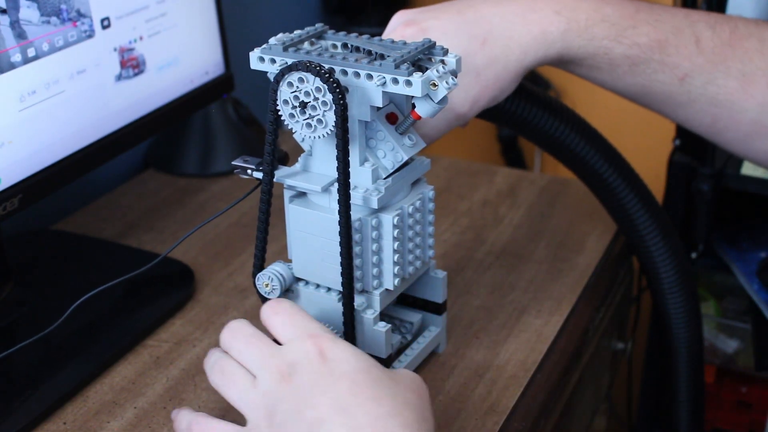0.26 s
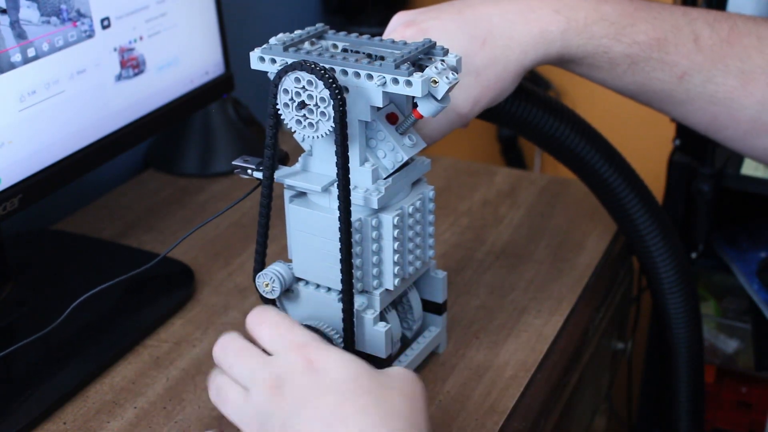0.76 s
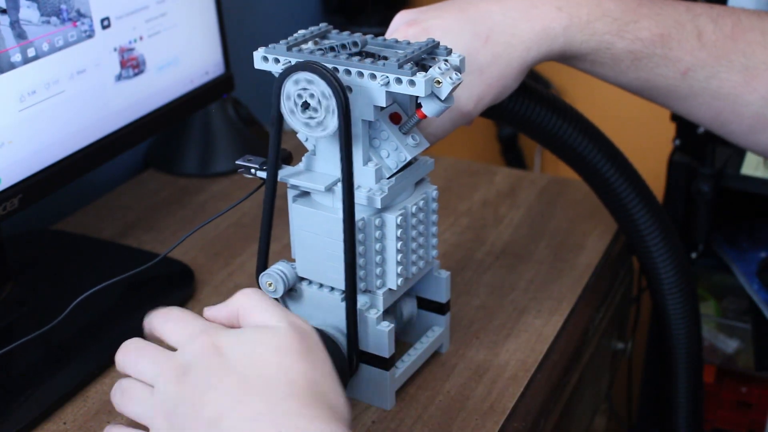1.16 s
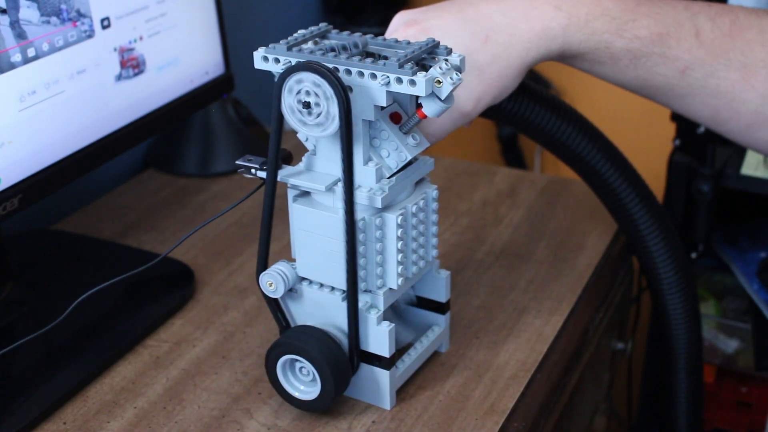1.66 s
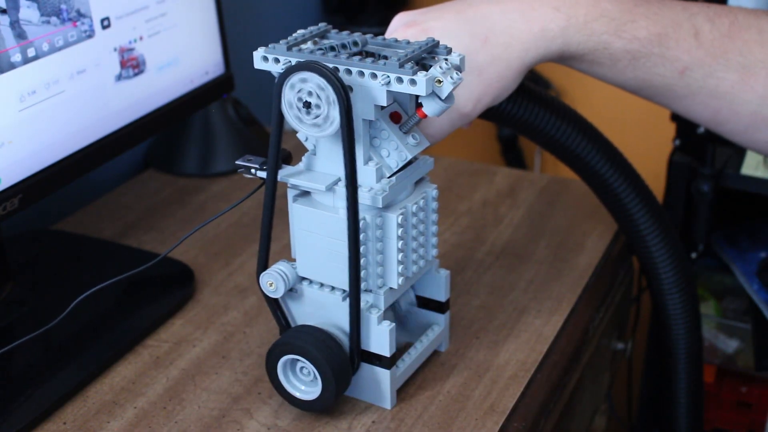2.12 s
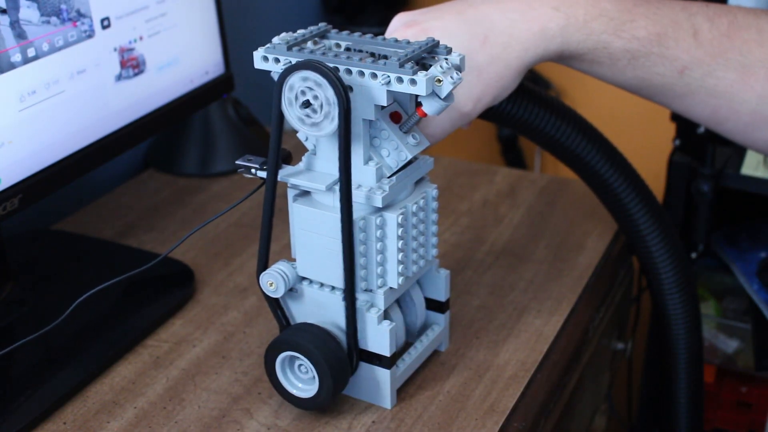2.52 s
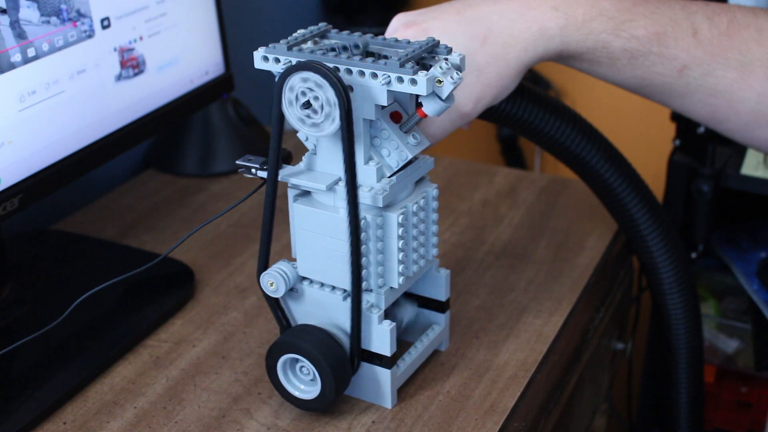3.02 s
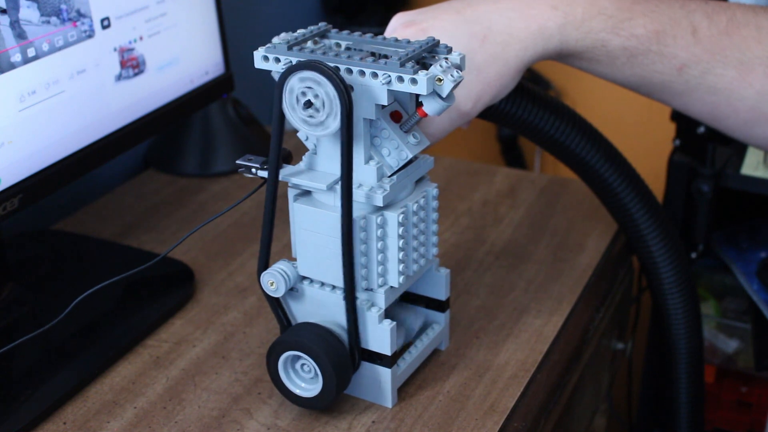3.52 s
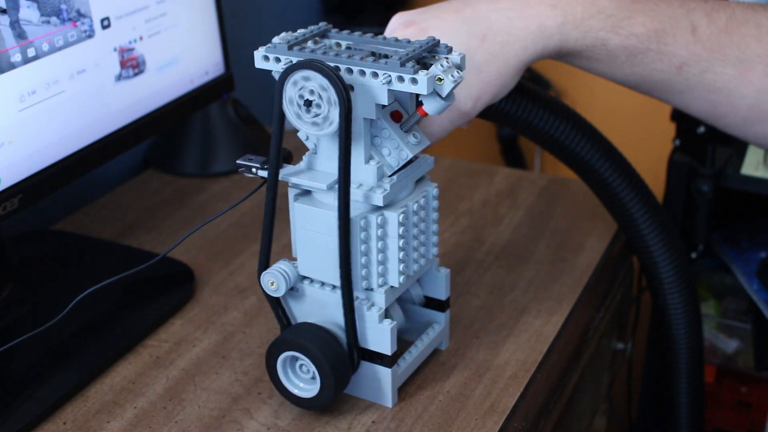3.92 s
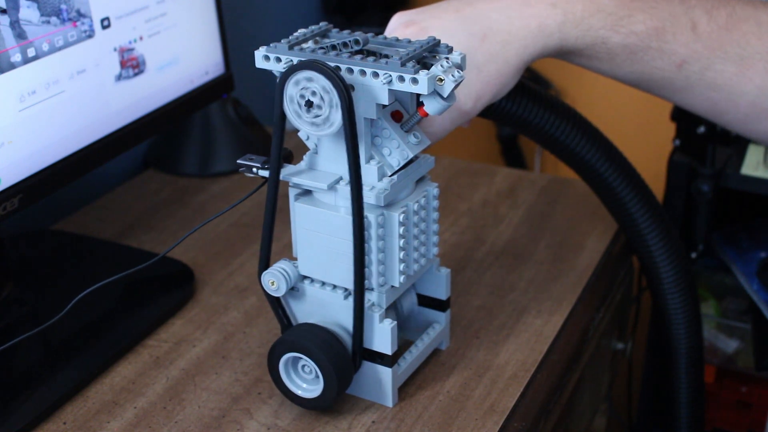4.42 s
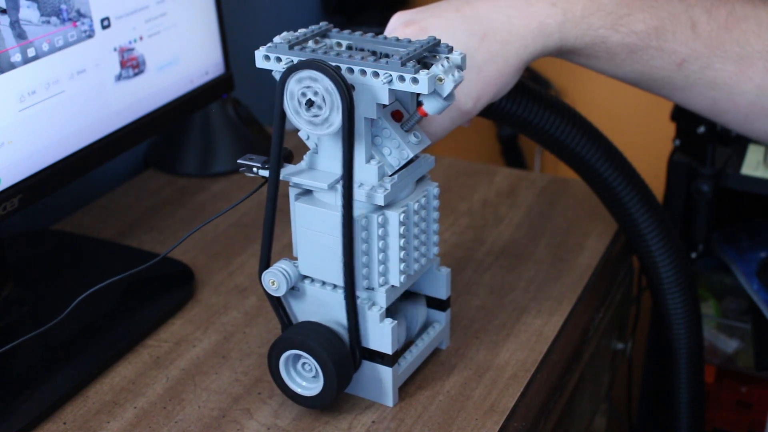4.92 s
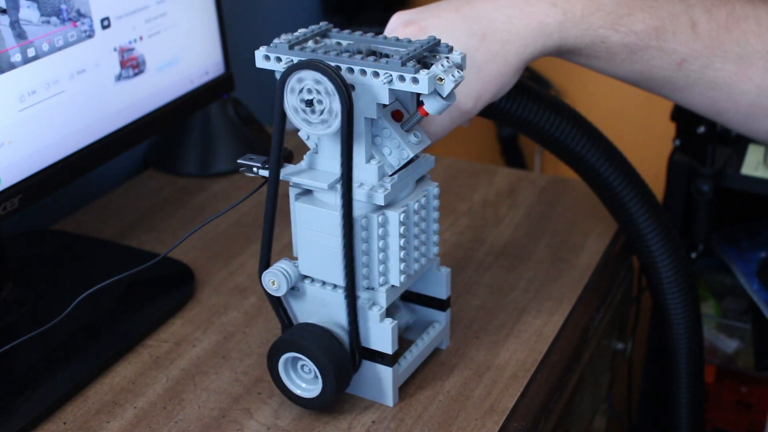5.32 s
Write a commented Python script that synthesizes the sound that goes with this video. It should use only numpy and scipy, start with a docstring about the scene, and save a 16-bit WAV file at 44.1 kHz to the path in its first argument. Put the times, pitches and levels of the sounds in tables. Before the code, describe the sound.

Close on a desk, a vacuum cleaner motor climbs slightly to a steady whine while air hisses brightly through a small plastic engine's joints. At about one second the engine starts: six or so quick strokes per second, each a hissing, whistling gulp of air cut off by a dull plastic slap and small bounce. It continues to the end, dry and close, in mono.

```python
"""A vacuum cleaner whines, its pitch rising as the motor runs up, while its hose sucks at a small plastic
piston engine on a desk, close to a mono microphone. Leaking air hisses (shaped noise) over a low rumble.
Once the flywheel is spun, at about 1 s, a valve opens on every cycle with a soft puff; air rushes and whistles
through the port (noise bands and a fluttering tone). The valve slaps shut (pressure flip, decaying modes, echoes)
and bounces; the leak stalls for a moment. Near 2.7 s the load eases and the motor gains a little speed."""
import sys
import numpy as np
from scipy import signal
from scipy.fft import rfft, irfft
from scipy.io import wavfile
from scipy.ndimage import uniform_filter1d

SR = 44100
rng = np.random.default_rng(int(sys.argv[2]) if len(sys.argv) > 2 else 0)


def master(y):
    """Save y as 16-bit WAV."""
    cut = np.clip(np.atleast_2d(y).T, -1, 1)
    pcm = np.round(cut * 32767)  # scale
    wavfile.write(sys.argv[1], SR, pcm.astype(np.int16))


def gain_from_decibels(decibels):
    """Convert decibel values to linear amplitude factors."""
    exponent = np.asarray(decibels, float) / 20
    return 10 ** exponent


N = 245637

# Valve cycles: (valve shuts [s], whistle level before trim and decay [dB])
VALVE_CYCLES = [(1.0526, -28.5), (1.2236, -30), (1.3873, -32), (1.547, -29), (1.7078, -31), (1.8636, -29.5),
                (2.021, -26), (2.1781, -28), (2.3353, -27.5), (2.4898, -26.5), (2.6421, -26),
                (2.7957, -26.5), (2.948, -26.5), (3.099, -26.5), (3.2533, -27.5), (3.405, -29.5),
                (3.5597, -26.5), (3.716, -26.5), (3.875, -27), (4.0274, -26.5), (4.1812, -27.5),
                (4.3338, -27), (4.4846, -27.5), (4.641, -29), (4.7995, -26.5), (4.9568, -32),
                (5.113, -29.5), (5.263, -29.5), (5.4165, -28), (5.5695, -29)]
# Rush spectrum: (frequency [Hz], relative level [dB])
RUSH_SPECTRUM = [(60, -13), (200, -7.5), (500, -8.5), (1200, -4), (2000, 2), (2700, 0.5), (3800, 5.5),
                 (4400, 1.5), (5200, -15.5), (6500, -32)]
# Valve-seat jet spectrum: (frequency [Hz], relative level [dB])
JET_SPECTRUM = [(4400, -27), (5400, -13), (6500, -7.5), (7600, -5), (8800, 4.5), (11000, 0), (12200, -5.5),
                (13500, -28)]
# Housing and desk-top modes: (frequency [Hz], mean level against the flip [dB], T60 [s])
BODY_MODES = [(44, -20, 0.13), (116, -17.5, 0.1), (386, -17, 0.062), (540, -54, .04), (800, -18, 0.026)]
# Slap returning from desk, screen and wall: (delay [s], mean level before factor [dB], signed factor [1])
SLAP_ECHOES = [(.0073, -12.5, 0.78), (.011, -15.5, -0.97), (0.0127, -38, -1)]
# Harder bounces: (time [s], level [dB])
HARD_BOUNCES = [(1.872, -33), (3.261, -33), (4.034, -31), (4.494, -33), (4.6476, -35)]
# Multiples of the shaft speed: (multiple [1])
SHAFT_MULTIPLES = (1, 4, 6, 12)
# Waver of each multiple: (scale of the random level [dB])
WAVER_SCALE_DB = (.7, 1.4, 0.92, 3.5)
# Base levels: (time [s], shaft tone [dB], 6th multiple [dB], leak hiss [dB])
BASE_LEVELS = [(0, -47, -65, -30.5), (.17, -42.5, -49, -30.5), (.35, -41, -52.5, -29),
               (.55, -41.5, -45, -30), (.74, -42.5, -52.5, -31), (.86, -44, -47, -31),
               (1.15, -43.5, -45.5, -30), (1.45, -45.5, -62, -31), (2.0, -45.5, -56, -31.5),
               (2.3, -45.5, -50.5, -32), (2.9, -47, -49, -33), (4.1, -47, -49, -32),
               (5.57, -45, -49.5, -31.5)]
# Leak spectrum: (frequency [Hz], relative level [dB])
LEAK_SPECTRUM = [(450, -27), (600, -16.5), (1150, -12), (1500, -14), (2300, -14.5), (2900, -11.5),
                 (3400, -7), (4000, -3.5), (4400, -10.5), (5000, -14.5), (5900, -13.5), (6500, -6.5),
                 (7600, -4.5), (10500, 1), (11400, -0.5), (12300, -9.5), (13400, -19), (15600, -19)]
# Rumble spectrum: (frequency [Hz], relative level [dB])
RUMBLE_SPECTRUM = [(20, -16), (45, -22), (80, -12), (125, 2), (200, 2.5), (300, 9.5), (420, 1), (600, -4),
                   (900, -32)]


def coloured(spectrum, low_hz, high_hz):
    """Noise with the given spectrum; its band low_hz-high_hz has rms 1."""
    hz = np.fft.rfftfreq(N, 1 / SR)
    at_hz, level_db = np.transpose(spectrum)
    gain = gain_from_decibels(np.interp(np.log(hz + 1), np.log(at_hz), level_db))
    band = (hz > low_hz) & (hz < high_hz)
    band_rms = np.sqrt(2 * np.sum(gain[band] ** 2) / N)
    return irfft(rfft(rng.standard_normal(N)) * gain, N) / band_rms


def walk(rate_hz):
    """Random levels held 1 / rate_hz and slewed twice; spread near 1."""
    hold = int(SR / rate_hz)
    steps = np.repeat(rng.standard_normal(N // hold + 1), hold)
    return 1.3 * uniform_filter1d(uniform_filter1d(steps, hold), hold)[:N]


def add_at(track, sound, start_s):
    """Mix a sound into a track, cut at the track's end."""
    i = int(start_s * SR)
    track[i:i + len(sound)] += sound[:len(track) - i]


def knock(hz, t60_s, t):
    """One decaying plastic mode."""
    return np.sin(2 * np.pi * hz * t) * np.exp(-np.log(1000) * t / t60_s)


def valve_times():
    """Opening and closing times: the cam holds the valve open for a share of each cycle."""
    open_share = 0.364
    shuts_s = np.transpose(VALVE_CYCLES)[0]
    cycle_s = np.diff(shuts_s)
    return shuts_s - open_share * np.append(cycle_s[0], cycle_s), shuts_s


def port_gap(opens_s, shuts_s, t):
    """Port opening, 0 to 1, ramping up and down with the valve."""
    opening = np.clip((t - opens_s + 0.0076) / 0.01, 0, 1)
    return opening * np.clip((shuts_s + 0.0014 - t) / 0.0042, 0, 1)


def rush(hiss_db, t):
    """Broad noise through the open port; the cylinder fills, so the flow eases."""
    mean_db, scatter_db = -8.5, -0.15  # against the leak hiss
    start_db, settles_s = 0.5, 0.81  # the first, slower strokes gulp more air
    ease_db_per_s = 99
    gain = np.zeros(N)
    first_shut_s = VALVE_CYCLES[0][0]
    for opens_s, shuts_s in zip(*valve_times()):
        since_s = np.clip(t - opens_s, 0, None)
        stroke_db = mean_db + scatter_db * rng.standard_normal()
        stroke_db += start_db * np.exp((first_shut_s - shuts_s) / settles_s)
        gain += port_gap(opens_s, shuts_s, t) * gain_from_decibels(hiss_db + stroke_db - ease_db_per_s * since_s)
    return gain * gain_from_decibels(1.4 * walk(40)) * coloured(RUSH_SPECTRUM, 1900, 3460)


def jet(t):
    """Thin jet at the valve seat: treble noise, alike on every stroke."""
    start_db, ease_db_per_s, late_s = -31, 76, 0.0028  # forms just after the rush begins
    gain = np.zeros(N)
    for opens_s, shuts_s in zip(*valve_times()):
        since_s = np.clip(t - opens_s, 0, None)
        forming = np.clip((t - opens_s + 0.0083 - late_s) / 0.0056, 0, 1)
        gain += port_gap(opens_s, shuts_s, t) * forming * gain_from_decibels(start_db - ease_db_per_s * since_s)
    return gain * coloured(JET_SPECTRUM, 8880, 12100)


def whistle(t):
    """Breathy edge tone in the port, climbing as the jet speeds up."""
    settled_hz, scatter_hz, climb_hz, climb_s = 8416, 35.14, 170, 0.012
    trim_db, ease_db_per_s = 1.0, 113
    gain, hz = np.zeros(N), np.full(N, float(settled_hz))
    for opens_s, (shuts_s, tone_db) in zip(valve_times()[0], VALVE_CYCLES):
        now = (t > opens_s - 0.01) & (t < shuts_s + 0.01)
        since_s = np.clip(t[now] - opens_s, 0, None)
        fade = np.clip(since_s / 0.0092, 0, 1) * np.clip((shuts_s - t[now]) / 0.0074, 0, 1)
        gain[now] += fade * gain_from_decibels(tone_db + trim_db - ease_db_per_s * since_s)
        hz[now] = settled_hz + scatter_hz * rng.standard_normal() - climb_hz * np.exp(-since_s / climb_s)
    noise = rng.standard_normal((2, N))
    flutter = signal.lfilter(*signal.butter(2, 170, fs=SR), noise[0] + 1j * noise[1])
    breath = 0.91 + flutter / flutter.std()  # a sustained core under noisy flutter
    phase = 2 * np.pi * np.cumsum(hz + 45 * walk(60)) / SR
    tone = np.real(breath * np.exp(1j * phase))
    return gain * tone / tone.std()


def valve_slap():
    """Closing valve: a pressure flip with body ringing and echoes."""
    start_db, growth_db_per_s, scatter_db = -32.5, 0.2, 0.8
    mode_scatter_db, echo_scatter_db = 2, 3
    lead_s = 0.004
    t = np.arange(int(0.12 * SR)) / SR
    u = (t - lead_s) / np.where(t < lead_s, 0.00052, 0.00048)
    flip = -u * np.exp((1 - u ** 2) / 2)
    ring_s = np.clip(t - lead_s, 0, None)
    out = np.zeros(N)
    for shuts_s in valve_times()[1]:
        slap = flip.copy()
        for hz, mode_db, t60_s in BODY_MODES:
            slap -= gain_from_decibels(mode_db + mode_scatter_db * rng.standard_normal()) * knock(hz, t60_s, ring_s)
        for delay_s, echo_db, factor in SLAP_ECHOES:
            echo_gain = factor * gain_from_decibels(echo_db + echo_scatter_db * rng.standard_normal())
            add_at(slap, echo_gain * flip, delay_s)
        slap_db = start_db + growth_db_per_s * shuts_s + scatter_db * rng.standard_normal()
        add_at(out, gain_from_decibels(slap_db) * slap, shuts_s - lead_s)
    return out


def valve_bounce():
    """The valve bounces after the slap: a short clack of one decaying mode, plus the harder bounces."""
    after_s, after_scatter_s = 0.0078, 0.00103
    mean_db, scatter_db = -39.5, 4
    mean_hz, scatter_share, t60_s = 1110, 0.054, 0.017
    t = np.arange(int(0.12 * SR)) / SR
    out = np.zeros(N)
    for shuts_s in valve_times()[1]:
        c = rng.standard_normal(3)
        clack = knock(mean_hz * (1 + scatter_share * c[0]), t60_s, t)
        start_s = min(shuts_s + after_s + after_scatter_s * c[1], N / SR)
        add_at(out, gain_from_decibels(mean_db + scatter_db * c[2]) * clack, start_s)
    for start_s, level_db in HARD_BOUNCES:
        add_at(out, gain_from_decibels(level_db) * knock(mean_hz, t60_s, t), start_s)
    return out


def valve_puff():
    """Opening valve: a slow soft pressure puff into the cylinder."""
    t = np.arange(int(0.12 * SR)) / SR
    w = (t - 0.03) / 0.0026
    puff = w * np.exp(-w ** 2 / 2)
    out = np.zeros(N)
    for opens_s in valve_times()[0]:
        add_at(out, gain_from_decibels(-49.5 + 1.7 * rng.standard_normal()) * puff, opens_s - 0.036)
    return out


def motor_speed_hz(t):
    """Exponential run-up; the load later eases as the engine settles, and the speed gains a little."""
    full_hz, gap_hz, run_up_s = 305.1, 19, 0.36
    eases_s, ease_width_s, ease_hz = 2.7, 0.21, 1.05
    run_up = full_hz - gap_hz * np.exp(-t / run_up_s)
    return run_up + ease_hz / (1 + np.exp((eases_s - t) / ease_width_s))


def motor(shaft_db, sixth_db, t):
    """Shaft imbalance and fan blades sing on multiples of the speed, each wavering in level."""
    hz = motor_speed_hz(t)
    phase = 2 * np.pi * np.cumsum(hz * (1 + 0.000606 * walk(11))) / SR
    # the faint 4th multiple blooms as it slides through a housing resonance
    fourth_db, bloom_db, bloom_hz, bloom_width_hz = -62, 7.5, 1176, 14
    bloom = np.exp(-((SHAFT_MULTIPLES[1] * hz - bloom_hz) / bloom_width_hz) ** 2)
    twelfth_db = shaft_db - 4
    tones_db = shaft_db, fourth_db + bloom_db * bloom, sixth_db, twelfth_db
    # the whine travels up the hose and sags in the later part of each stroke
    sag_db = sum(-3 * np.exp(-((t - shuts_s + 0.009) / 0.028) ** 2) for shuts_s, _ in VALVE_CYCLES)
    out = np.zeros(N)
    for multiple, tone_db, waver_db in zip(SHAFT_MULTIPLES, tones_db, WAVER_SCALE_DB):
        gain = gain_from_decibels(tone_db + sag_db + waver_db * walk(18))
        out += np.sqrt(2) * gain * np.sin(multiple * phase)
    return out


def leak(hiss_db, t):
    """Turbulent suction through the joints; the shock of each valve slap stalls it, and it recovers."""
    stall = np.zeros(N)
    for shuts_s, _ in VALVE_CYCLES:
        after_s = np.clip(t - shuts_s + 0.0018, 0, None)
        stall += (1 - np.exp(-after_s / 0.0056)) * np.exp(-after_s / 0.02)
    turbulence_db = 0.5 * walk(24.9) + 0.35 * walk(150)
    return coloured(LEAK_SPECTRUM, 8740, 13000) * gain_from_decibels(hiss_db - 6.1 * stall + turbulence_db)


def rumble(t):
    """Wavering low noise, raised when the turning engine shakes the desk."""
    still_db = -58.5
    shaking_db = 4 * np.clip((t - 0.9) / 0.11, 0, 1)
    return gain_from_decibels(still_db + shaking_db + 1.3 * walk(6.07)) * coloured(RUMBLE_SPECTRUM, 20, 900)


def scene():
    """All sources reach one microphone, on two equal channels."""
    t = np.arange(N) / SR
    at_s, *columns = np.transpose(BASE_LEVELS)
    shaft_db, sixth_db, hiss_db = (np.interp(t, at_s, column) for column in columns)
    port = rush(hiss_db, t) + jet(t) + whistle(t)
    valve = valve_slap() + valve_bounce() + valve_puff()
    mono = port + valve + motor(shaft_db, sixth_db, t) + leak(hiss_db, t) + rumble(t)
    return np.array([mono, mono])


def band_limit(x):
    """A steep low-pass at the top of the band."""
    return signal.sosfilt(signal.butter(12, 15720, fs=SR, output="sos"), x)


def record(dry):
    """The microphone drops the deepest bass: first-order high-pass at 25 Hz."""
    mix = signal.lfilter(*signal.butter(1, 25, "high", fs=SR), dry)
    return band_limit(mix)


dry = scene()
out = record(dry)
master(out)
```